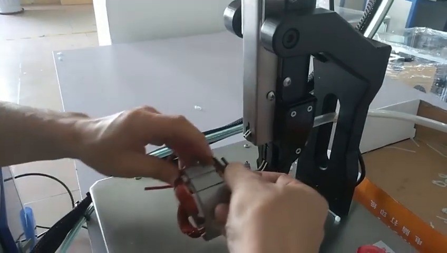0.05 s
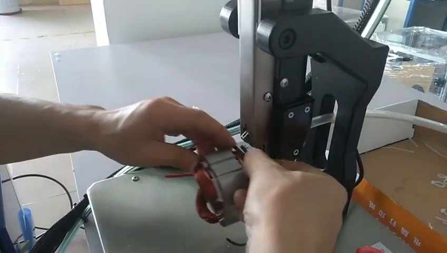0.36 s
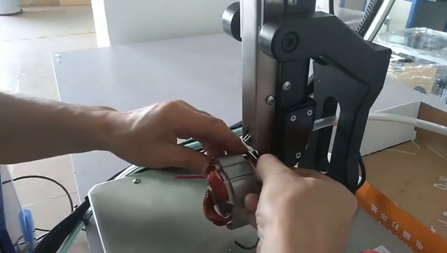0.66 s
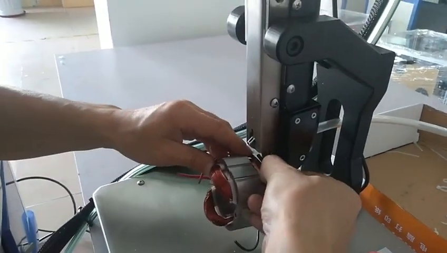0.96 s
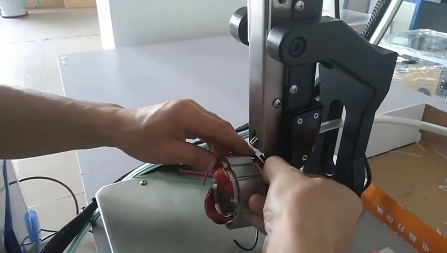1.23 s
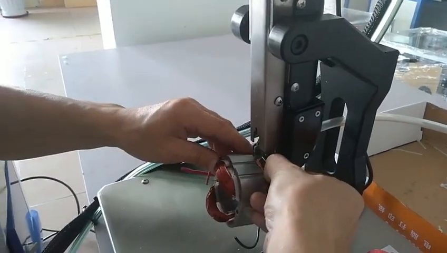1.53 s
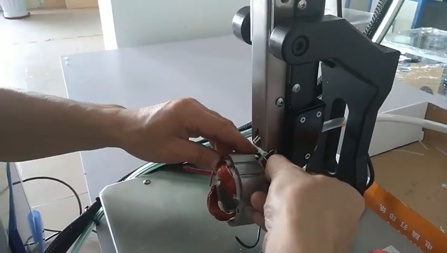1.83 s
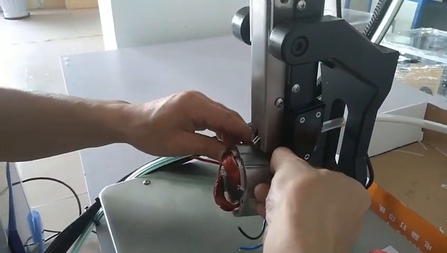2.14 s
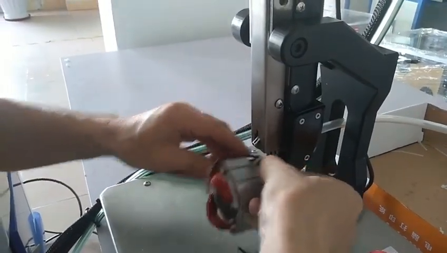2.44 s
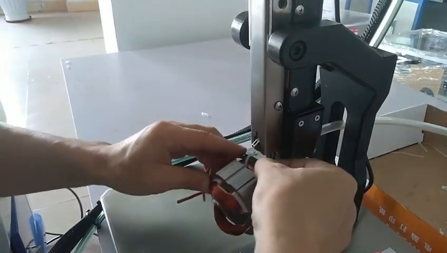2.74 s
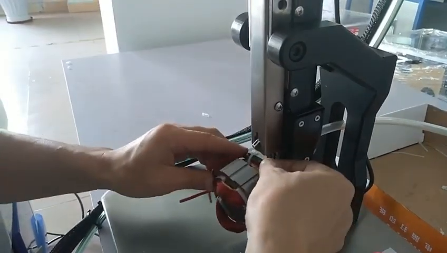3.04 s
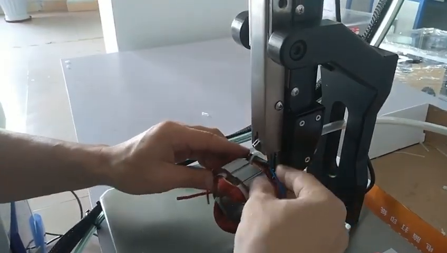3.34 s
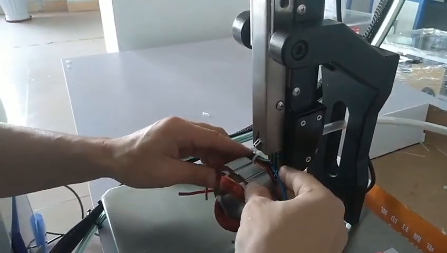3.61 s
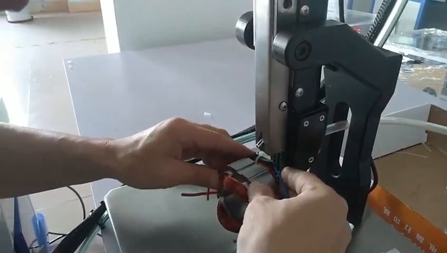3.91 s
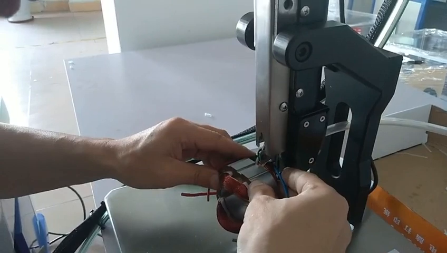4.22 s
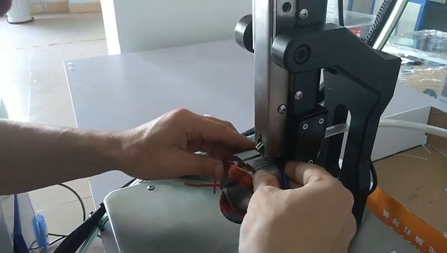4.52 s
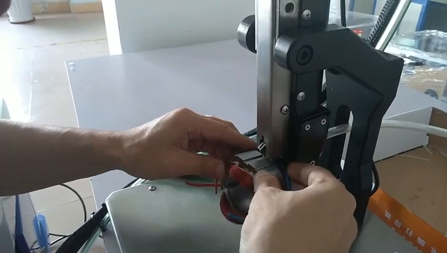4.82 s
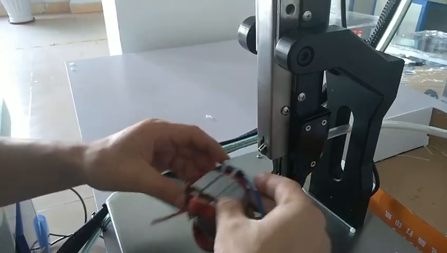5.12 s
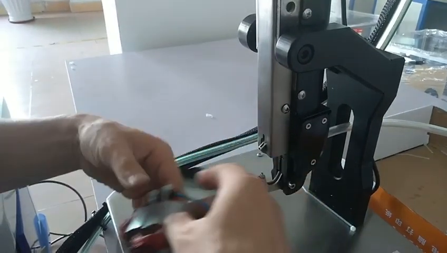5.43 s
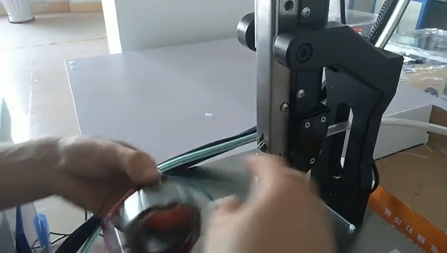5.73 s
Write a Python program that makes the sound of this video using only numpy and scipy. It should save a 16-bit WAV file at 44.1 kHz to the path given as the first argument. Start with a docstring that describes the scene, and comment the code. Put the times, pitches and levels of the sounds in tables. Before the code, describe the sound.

Two matching bursts of compressed air hiss, with clicks, light knocks and a closing puff, echo in a humming workshop.

```python
"""Air-powered tying machine in a workshop

A machine ties a motor coil twice, with the same timing, over mains hum, a motor, fans and a far whine.
Each time a valve clacks, air blows the tie forward, a harder jet hisses as it is tightened and slides
knock. Half a second later a cylinder vents through a short pipe. Hard walls echo it all, and the two
microphones are wired in opposite polarity: one swings up when the other swings down."""
import sys
import numpy as np
from scipy import signal
from scipy.fft import rfft, irfft, next_fast_len
from scipy.io import wavfile
from scipy.ndimage import map_coordinates

SR = 44100
rng = np.random.default_rng(int(sys.argv[2]) if len(sys.argv) > 2 else 0)


def dump(signal):
    """Clip the signal to [-1, 1] and save it as 16-bit WAV at the path in sys.argv[1]."""
    limited = np.clip(np.atleast_2d(signal).T, -1, 1)
    pcm = np.round(limited * 32767).astype(np.int16)
    wavfile.write(sys.argv[1], SR, pcm)


N = 262836
TIME = np.arange(N) / SR
FILTER_SIZE = 4096
HZ = np.fft.rfftfreq(FILTER_SIZE, 1 / SR)

# When the machine fires, once for each tie: start_s
CYCLE_STARTS_S = [1.411, 3.957]
TIGHTEN_ON_S, TIGHTEN_OFF_S = 0.582, 1.076  # counted from each firing


def amp(db):
    """Turn decibels into a gain."""
    return np.exp(np.asarray(db) * (np.log(10) / 20))


def unit(x):
    """Scale a signal to an average power of 1."""
    return x / np.sqrt(np.mean(np.abs(x) ** 2) + 1e-20)


def curves(table, hz=HZ):
    """Join a table's points into curves over pitch; its first column is the pitch."""
    pitches, *columns = np.transpose(table)
    return np.array([np.interp(np.log(hz + 1), np.log(pitches + 1), column) for column in columns])


def resonance_db(peaks):
    """The boost at each pitch from a set of resonances (pitches at which something rings)."""
    return sum(db / (1 + (2 * (HZ - hz) / width) ** 2) for hz, width, db in peaks)


def coloured(x, curve_db):
    """Filter a sound so that it follows a curve's shape; the curve's overall level is ignored."""
    cepstrum = irfft(np.log(unit(amp(np.atleast_2d(curve_db))) + 1e-6))
    # Folding onto the first half makes the filter ring after a sound, never before it.
    cepstrum[:, 1:FILTER_SIZE // 2] *= 2
    cepstrum[:, FILTER_SIZE // 2 + 1:] = 0
    response = irfft(np.exp(rfft(cepstrum)))
    return signal.oaconvolve(np.atleast_2d(x), response, axes=1)[:, :x.shape[-1]]


def wobble(rate):
    """A smooth curve through `rate` random values a second."""
    coarse_time = TIME[::64]
    values = rng.standard_normal(int(N * rate / SR) + 4)
    return np.interp(TIME, coarse_time, map_coordinates(values, [coarse_time * rate]))


def diffuse_noise(size, spacing_m=0.14):
    """Noise from all sides at the two microphones: opposite in the bass, unrelated in the treble."""
    length = next_fast_len(size)
    hz = np.fft.rfftfreq(length, 1 / SR)
    likeness = -0.98 * np.sinc(2 * hz * spacing_m / 343)
    angle = np.arccos(likeness) / 2
    spectra = rfft(rng.standard_normal((2, length))) * [np.cos(angle), np.sin(angle)]
    common, opposed = irfft(spectra, length)[:, :size]
    return np.array([common + opposed, common - opposed])


def tone(hz, opposed_db, common_db, drift_rad=0.13):
    """A wavering tone, with one part opposite at the two microphones and one part the same in both."""
    phase = 2 * np.pi * ((hz * TIME + rng.random()) % 1) + drift_rad * wobble(12)
    opposed, common = amp(opposed_db) * np.sin(phase), amp(common_db) * np.cos(phase)
    waver_db = (1.5 + 2 * drift_rad) * wobble(5.026)
    return np.sqrt(2) * amp(waver_db) * np.array([common + opposed, common - opposed])


def bench_echoes(t60_s=0.042, size=2048):
    """Quick echoes off the bench and frame. A t60 is the time a sound takes to fade by 60 dB."""
    return unit(diffuse_noise(size) * amp(-60 * TIME[:size] / t60_s)) / np.sqrt(size)


def hall_echoes(build_s=0.0092, size=256):
    """The hard walls keep the sound going; the high treble dies first."""
    # How long the hall rings: pitch_hz, t60_s
    ring_times = [(150, 0.71), (800, 1.22), (3000, 1.36), (6000, 0.93), (10000, 0.84), (14000, 0.56)]
    slices = diffuse_noise(size * 128).reshape(2, -1, size)
    t = TIME[:slices[0].size]
    hz, slice_s = np.fft.rfftfreq(size, 1 / SR), t[size // 2::size, None]
    envelope = amp(-60 * slice_s / curves(ring_times, hz)) * (1 - np.exp(-slice_s / build_s))
    tail = irfft(rfft(slices) * envelope).reshape(2, -1)
    return unit(tail) / np.sqrt(len(t))


def shifting_echoes(x, make_echoes, size):
    """Give each overlapping piece of a sound its own fresh set of echoes."""
    out = np.zeros((2, N))
    for start in range(0, N, size // 2):
        piece = x[:, start:start + size] * signal.windows.cosine(size)[:N - start]
        if np.abs(piece).max() > 1e-5:
            echo = signal.fftconvolve(piece, make_echoes(), axes=1)[:, :N - start]
            out[:, start:start + echo.shape[1]] += echo
    return out


def workshop(x, hall_db, bench_db, left_lag_samples=19):
    """Sound reaches the right microphone first; its echoes keep changing as hands and coil move."""
    x = x * np.ones((2, 1))
    direct = np.array([np.roll(x[0], left_lag_samples), -x[1]])
    bench = amp(bench_db) * shifting_echoes(x, bench_echoes, size=SR // 4)
    hall = amp(hall_db) * shifting_echoes(x, hall_echoes, size=SR)
    return (direct + bench + hall) / np.sqrt(1 + amp(hall_db) ** 2 + amp(bench_db) ** 2)


def fans_and_leak(level_db=-36):
    """Fans and a faint, steady air leak fill the hall with soft noise."""
    # Tone colour of the background: pitch_hz, left_db, right_db
    colour = [(25, -31.5, -26.5), (71, -11.5, -8), (200, -4, -3.5), (460, -9.5, -6), (770, -12.5, -9),
              (1460, -12, -15), (2880, -9.5, -16), (5600, -11.5, -18.5), (5970, -14.5, -19.5),
              (7500, -12.5, -36), (9800, -14.5, -60), (11680, -23.5, -58), (12800, -75, -59)]
    # Resonances in the background: pitch_hz, width_hz, boost_db
    peaks = [(744, 200, 6.5), (1330, 100, 5.5), (1720, 260, 6), (4060, 100, 2), (4920, 270, 3.5)]
    gain = amp(level_db + 0.3 * wobble(3))
    return gain * coloured(diffuse_noise(N), curves(colour) + resonance_db(peaks))


def distant_whine(waver_db=1.5, trim_db=-1.5):
    """A machine across the hall gives thin tones that each waver on their own."""
    # Tones of the whine: pitch_hz, relative_db
    tones = [(1249, -55), (1351, -56.5), (1556, -59), (1674, -60.5), (2589, -60), (2998, -60.5),
             (4059, -59), (4151, -60)]
    return sum(amp(waver_db * wobble(2.49) + trim_db) * tone(hz, db, db, drift_rad=0.9)
               for hz, db in tones)


def mains_hum(mains_hz=50.04):
    """The power supply hums at whole multiples of its frequency."""
    # Tones of the hum: multiple, opposed_db, common_db
    harmonics = [(1, -56, -100), (2, -44, -69.5), (3, -42, -61.5), (4, -40.5, -100), (5, -37, -62),
                 (6, -54, -60.5), (7, -46.5, -60.5), (10, -56, -64.5), (11, -48, -55.5), (12, -66, -61.5),
                 (15, -57, -61.5), (16, -68, -55.5), (17, -66, -67), (19, -68, -62.5), (20, -55, -59),
                 (24, -62, -61)]
    return sum(tone(round(multiple) * mains_hz, opposed_db, common_db)
               for multiple, opposed_db, common_db in harmonics)


def motor_and_fading_hum(change_s=(1.82, 2.58)):
    """During the first tie most of these tones grow louder, while a hum tone near 400 Hz fades."""
    # Tones that change level: pitch_hz, before_db, after_db, common_db (relative to the opposed part)
    tones = [(169, -56, -48, -17), (232.5, -53, -37.5, -20), (402, -51, -58.5, -3.5),
             (755, -72, -52.5, -1.5), (1182, -65, -61.5, -0.5)]
    out = np.zeros((2, N))
    for hz, before_db, after_db, common_db in tones:
        gain = amp(np.interp(TIME, change_s, [before_db, after_db]))
        out += gain * tone(hz, 0, common_db, drift_rad=0.9)
    return out


def knocks(gain_db=8.0, rise_share=0.03, size=8192):
    """Each contact is a short rattle that rings the frame; hard ones are bright, heavy slides dull."""
    # Valve, tie, slide, cutter and jaw knocks in every cycle, timed from its firing:
    # start_s, relative_db, pitch_hz, width_octaves, t60_s
    cycle_knocks = [(-.036, -20, 2100, 0.54, 0.038), (-.032, -19, 1770, 0.45, 0.038),
                    (-.027, -30, 4950, 2.1, 0.12), (0, -8.5, 6330, 1.7, 0.011), (.001, -35, 547, 1.3, 0.22),
                    (.001, -18, 2770, 0.11, 0.028), (.019, -21.5, 2900, 0.29, 0.078),
                    (.071, -30, 1220, 0.78, 0.072), (.074, -10, 3850, 0.85, 0.009),
                    (0.551, -29.5, 160, 0.32, 0.17), (.572, -29.5, 890, 1.3, 0.11),
                    (.598, -25, 390, 0.3, 0.099), (.8, -23.5, 520, 1.15, 0.046),
                    (1.004, -27, 900, 0.44, 0.053), (1.02, -30.5, 515, 1.3, 0.11),
                    (1.07, -33.5, 650, 1.2, 0.41), (1.165, -21, 2000, 2.2, .11),
                    (1.167, -28.5, 2980, 0.12, .2), (1.169, -29.5, 980, 0.17, 0.13),
                    (1.171, -28.5, 240, 1.1, 0.15), (1.212, -35.5, 680, 1.2, 0.27),
                    (1.381, -29.5, 760, 2, 0.13), (1.385, -36.5, 6370, 0.78, 0.19),
                    (1.626, -18.5, 4830, 1.5, 0.016), (1.627, -24, 1865, 0.43, 0.042),
                    (1.638, -34.5, 650, 1.1, 0.062)]
    # The second tie snags on its way: same columns, timed from the start of the scene
    snags = [(4.009, -18, 2990, 1.1, 0.032), (4.032, -25, 2600, 0.91, 0.06), (4.21, -29, 420, 1.4, 0.07),
             (4.305, -24.5, 2070, 0.5, 0.16)]
    # Resonances of the machine frame: pitch_hz, width_hz, boost_db
    frame_peaks = [(368, 190, 9.5), (732, 59, 6), (964, 140, 4.5), (2040, 570, 3.5)]
    out, t, frame_db = np.zeros(N + SR), TIME[:size], resonance_db(frame_peaks)
    contacts = [(fire_s + delay_s, *knock)
                for fire_s in CYCLE_STARTS_S for delay_s, *knock in cycle_knocks]
    for start_s, db, hz, octaves, t60_s in contacts + snags:
        band_db = -20 * np.log10(1 + (np.log2((HZ + 1) / hz) / octaves) ** 2)
        softness_db = -10 * np.log10(1 + (HZ / (2 * hz)) ** 2)  # a longer contact holds less treble
        noise = rng.standard_normal(size + FILTER_SIZE)
        rattle = coloured(noise, band_db + softness_db + frame_db)[0, FILTER_SIZE:]
        force = amp(db - 60 * t / t60_s) * (1 - np.exp(-t / (rise_share * t60_s)))
        out[round(start_s * SR):][:size] += unit(force * rattle) * np.sqrt(np.mean(force ** 2))
    return workshop(amp(gain_db) * out[:N], hall_db=2.0, bench_db=4.5)


def cylinder_vent(delay_s=1.624, gain_db=-16.5, t60_s=0.181, landing_s=0.053, surge_db=-7.5):
    """Air puffs out through a short pipe, then surges again as the piston lands."""
    # Resonances of the exhaust pipe: pitch_hz, width_hz, boost_db
    pipe_peaks = [(560, 110, 5), (950, 220, 7), (2000, 320, 9), (2960, 220, 13), (3830, 340, 12),
                  (4680, 240, 13), (5620, 280, 9), (6450, 300, 5), (8550, 450, 6), (9470, 260, 9)]
    # Tone colour of the puff: pitch_hz, left_db, right_db
    colour = [(49.9, -40, -43), (100, -27, -19), (380, -6, -1.5), (930, -3, -2.5), (1310, -11.5, -10),
              (1990, -2.5, -11), (2550, -7.5, -12), (3950, -6, -11), (7100, -5.5, -14), (9000, -3, -19),
              (11320, -3.5, -31), (12600, -12.5, -35), (14000, -12, -36)]
    out = np.zeros(N)
    for fire_s in CYCLE_STARTS_S:
        t = np.maximum(TIME - fire_s - delay_s, 0)
        surge = amp(surge_db) * np.exp(-((t - landing_s) / 0.024) ** 2)
        puff = (1 - np.exp(-t / 0.0014)) * (amp(-60 * t / t60_s) + surge)
        pipe_air = coloured(rng.standard_normal(N), resonance_db(pipe_peaks))[0]
        pitch_ratio = 1 - 0.089 * np.exp(-t / 0.02195)  # the pipe starts low and slides up
        out += amp(gain_db) * puff * map_coordinates(pipe_air, [np.cumsum(pitch_ratio)])
    return workshop(coloured(out, curves(colour)), hall_db=0.5, bench_db=0.5)


def valve_flow(pressure, open_s, shut_s, close_t60_s, flutter_db=0.55):
    """Each cycle, air follows pressure(time since opening), flutters, and dies as the valve shuts."""
    out = np.zeros(N)
    for fire_s in CYCLE_STARTS_S:
        t = TIME - fire_s
        closing = amp(-60 * np.maximum(t - shut_s, 0) / close_t60_s)
        out += (t >= open_s) * pressure(np.maximum(t - open_s, 0)) * closing
    return out * amp(flutter_db * wobble(60))


def jaw_whistle(width_hz=680, left_db=-8.5):
    """Air crossing the edge of the jaws makes a rough whistle that shifts as the coil is moved."""
    # Path of the whistle: time_s, pitch_hz, level_db (at the right microphone)
    path = [(1.42, 4820, -28), (1.509, 4730, -20.5), (1.75, 4425, -28.5), (1.9, 4520, -22),
            (2.1, 4270, -20.5), (2.331, 4260, -23), (2.478, 4050, -26), (3.96, 4850, -30),
            (4.06, 4850, -27), (4.332, 4798, -28), (4.519, 4597, -22.5), (4.62, 4296, -21.5),
            (4.9, 4200, -23.5), (5.029, 4000, -29)]
    time_s, hz, db = np.transpose(path)
    lowpass = signal.butter(2, width_hz / 2, fs=SR)
    eddies = unit(signal.lfilter(*lowpass, rng.standard_normal(N) + 1j * rng.standard_normal(N)))
    phase = 2 * np.pi * np.cumsum(np.interp(TIME, time_s, hz)) / SR
    whistle = unit(np.real(eddies * np.exp(1j * phase))) * amp(np.interp(TIME, time_s, db))
    flow = valve_flow(np.ones_like, 0, TIGHTEN_OFF_S, close_t60_s=0.016)
    return amp([[left_db], [0]]) * whistle * flow


def feed_jet(level_db=-19.5, creep_db_per_s=2.5, fill_s=0.034, swell_at_s=0.09):
    """The hose fills, the hiss swells as the tie shoots forward, then it slowly grows."""
    # Tone colour of the feed air: pitch_hz, left_db, right_db
    colour = [(40, -54, -38), (503, -16.5, -13.5), (1110, -16, -11), (1800, -6, -10.5), (2500, -4, -6.5),
              (2820, -6.5, -5), (3500, 0.5, -0.5), (4570, -2, -6), (5560, -4, 0.5), (6160, -6.5, 1.5),
              (7000, -2.5, -5.5), (8000, -2.5, -3.5), (10200, -3.5, -10), (12000, -10.5, -10.5),
              (14100, -13.5, -13)]

    def pressure(t):
        filling_db = -9 * np.exp(-t / fill_s)
        swell_db = 2.5 * np.exp(-((t - swell_at_s) / 0.027) ** 2)
        return amp(level_db + filling_db + swell_db + creep_db_per_s * t)

    flow = valve_flow(pressure, 0, TIGHTEN_ON_S, close_t60_s=0.12)
    return coloured(flow * rng.standard_normal(N), curves(colour))


def tightening_jet(level_db=-15.5, creep_db_per_s=0.5, rise_s=0.0025):
    """A brighter, faintly whistling jet starts quickly and hardens as the tie tightens."""
    # Tone colour of the jet: pitch_hz, left_db, right_db
    colour = [(100, -15, -24), (498, -21, -16.5), (1110, -25, -18), (1800, -13, -15), (2600, -3, -4),
              (2900, -6, -3.5), (3620, -1.5, -4.5), (5570, -4.5, -2), (6260, -4, -1.5), (7200, -4.5, -6.5),
              (9350, 0, -8), (10100, -2, -8.5), (13000, -11, -11), (14700, -12, -14.5)]
    # Whistling resonances of the jet: pitch_hz, width_hz, boost_db
    whistles = [(2880, 250, -1.5), (6430, 220, 3), (7377, 200, -0.5), (7460, 170, 6.5), (8080, 220, 6),
                (8847, 250, 2), (13500, 330, 4)]
    aim = np.array([[1], [0.3]])  # the whistles point at the left microphone

    def pressure(t):
        return amp(level_db + creep_db_per_s * t) * (1 - np.exp(-t / rise_s))

    flow = valve_flow(pressure, TIGHTEN_ON_S, TIGHTEN_OFF_S, close_t60_s=0.022)
    return coloured(flow * rng.standard_normal(N), curves(colour) + aim * resonance_db(whistles))


def scene():
    """The machine's jets, puffs and knocks over the workshop's background."""
    jets = workshop(feed_jet() + tightening_jet() + jaw_whistle(), hall_db=2.0, bench_db=5.0)
    machine = jets + cylinder_vent() + knocks()
    return machine + mains_hum() + motor_and_fading_hum() + distant_whine() + fans_and_leak()


def record(dry, low_cut_hz=41, top_hz=14300):
    """The microphones lose the deep bass, and the highest treble is cut off."""
    length = next_fast_len(N + SR // 4)
    hz = np.fft.rfftfreq(length, 1 / SR)
    bass_cut = hz / np.hypot(hz, low_cut_hz)
    treble_cut = 1 / (1 + (hz / top_hz) ** 200)
    return irfft(rfft(dry, length) * bass_cut * treble_cut, length)[:, :N]


dry = scene()
out = record(dry)
dump(out)
```